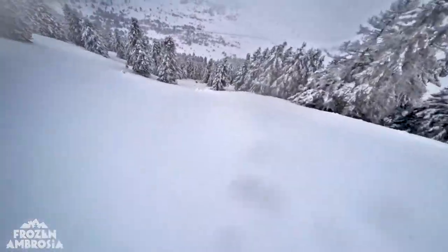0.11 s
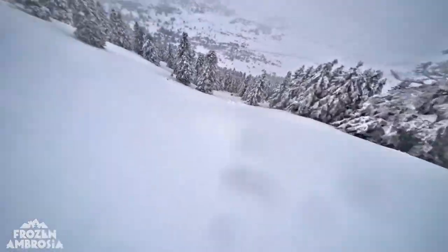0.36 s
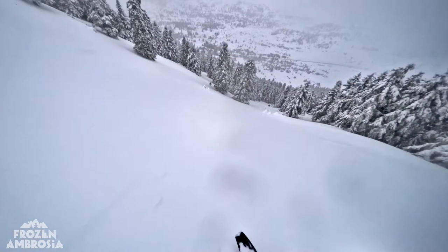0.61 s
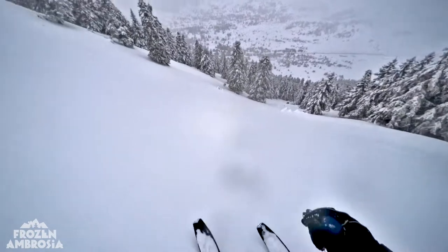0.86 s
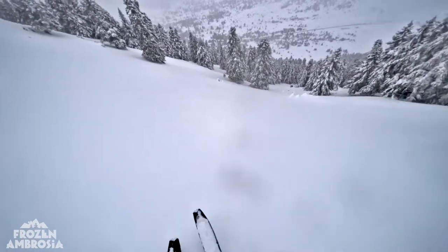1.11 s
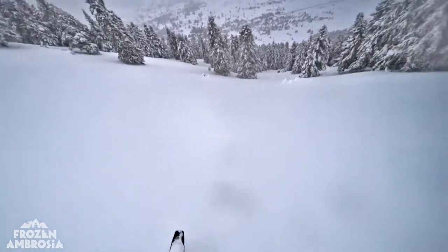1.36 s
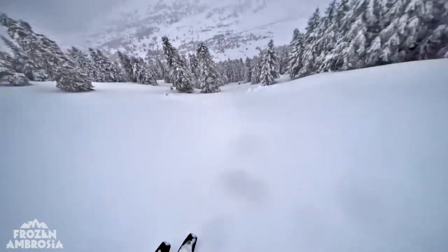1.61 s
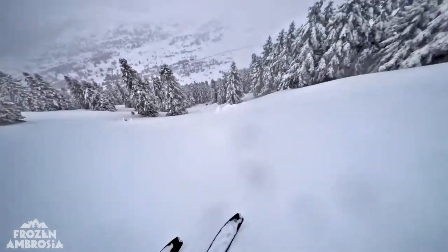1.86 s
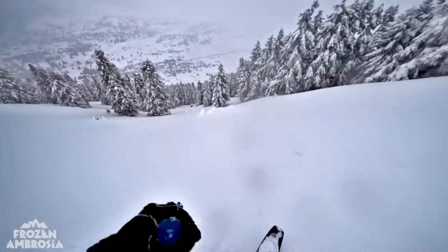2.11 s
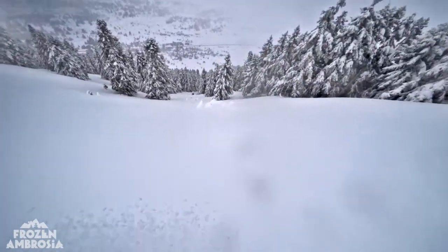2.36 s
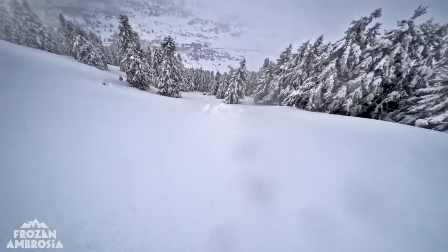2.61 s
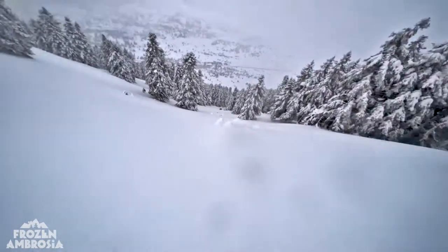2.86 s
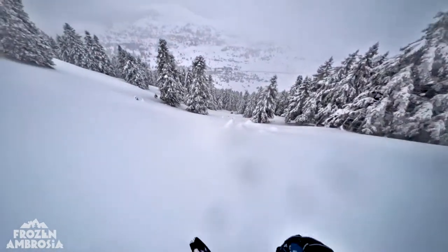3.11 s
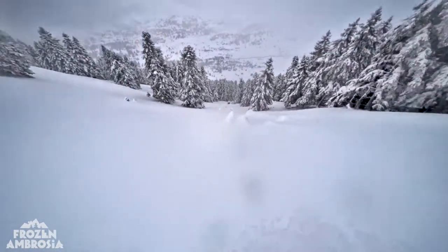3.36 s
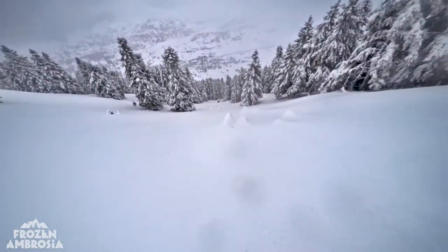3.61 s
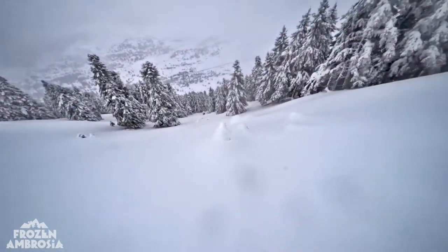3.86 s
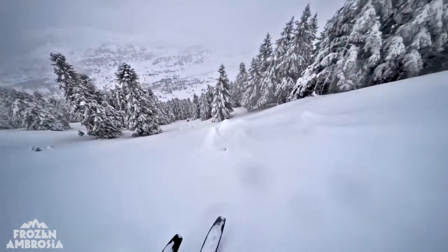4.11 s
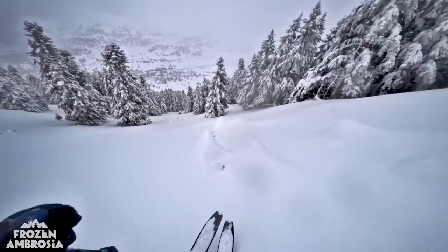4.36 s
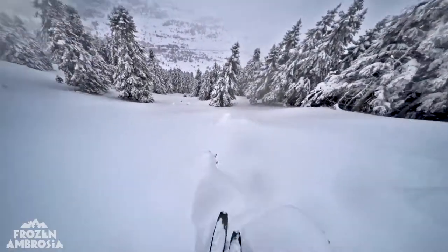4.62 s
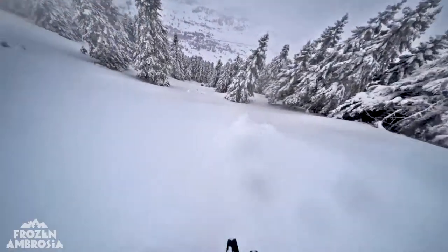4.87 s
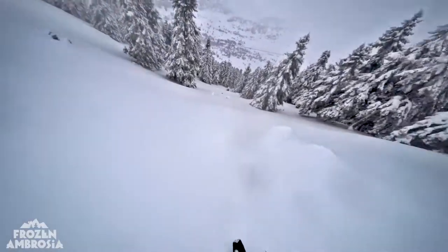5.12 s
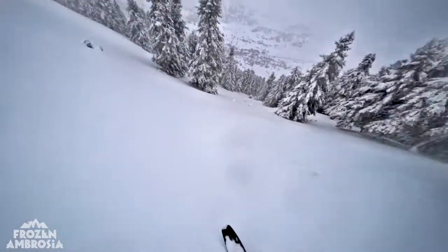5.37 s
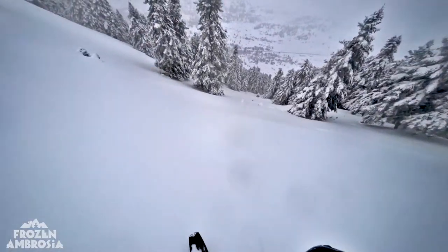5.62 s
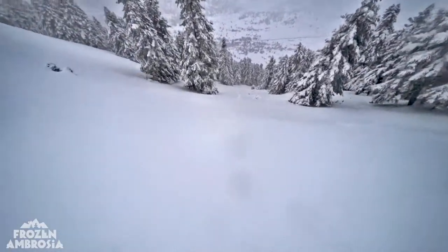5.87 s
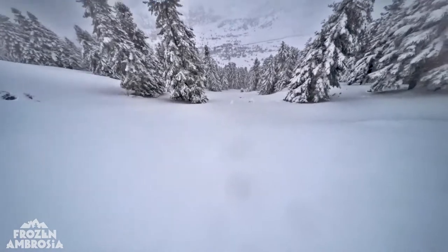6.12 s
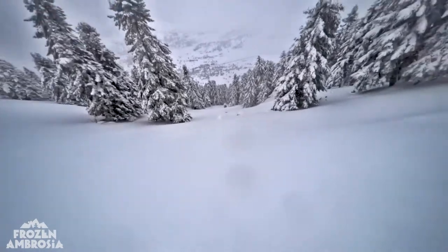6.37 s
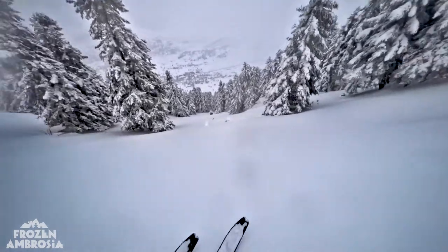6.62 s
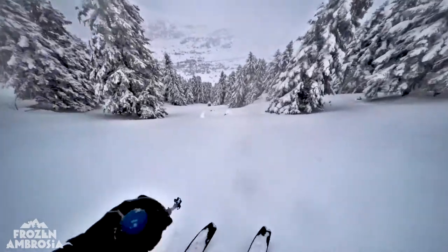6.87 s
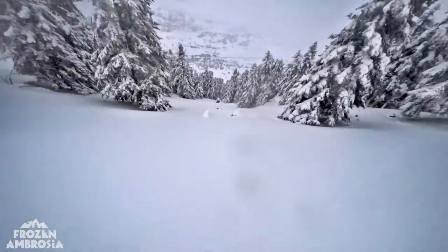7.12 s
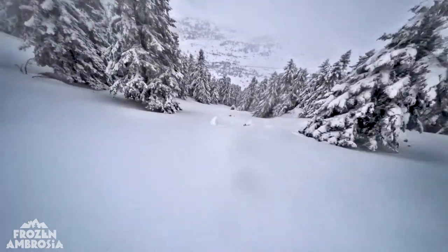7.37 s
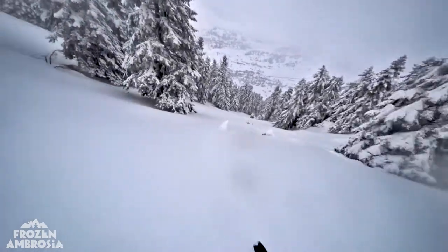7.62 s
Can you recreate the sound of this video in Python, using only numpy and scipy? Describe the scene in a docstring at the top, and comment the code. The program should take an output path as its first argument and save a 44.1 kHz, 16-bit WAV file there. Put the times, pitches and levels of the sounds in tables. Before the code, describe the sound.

Skier's head-mounted microphone hears deep wind buffeting, snow hiss swelling with each carve, and sharp little knocks rattling the plastic shell.

```python
"""Skiing in powder, heard at the head

A skier swings down a powder slope with a small camera in a plastic housing on the head.
Wind buffets the microphone port and booms in the housing: shaped noise on level curves. The skis hiss
through snow, swelling with each carve: flickering noise bands. Mount and ice tick and creak on the shell:
decaying rings, clicks and runs of slips. Shell resonances colour all but the low buffeting."""
import sys
import numpy as np
from scipy import signal
from scipy.fft import rfft, irfft, next_fast_len
from scipy.io import wavfile
from scipy.ndimage import uniform_filter1d

SR = 44100
rng = np.random.default_rng(int(sys.argv[2]) if len(sys.argv) > 2 else 0)


def unload_wav(signal):
    """Save mono or channel-first audio to the path in sys.argv[1] as 16-bit WAV at rate SR, clipped to [-1, 1]."""
    wavfile.write(
        sys.argv[1],
        SR,
        np.round(np.clip(np.atleast_2d(signal).T, -1, 1) * 32767).astype(np.int16),
    )


def decibels_to_gain(level_db):
    """Convert a level in decibels to a linear amplitude gain (20 dB per decade)."""
    exponent = np.asarray(level_db, float) / 20
    return 10 ** exponent


N = 341334


def rms_one(x):
    """Scales to rms 1."""
    return x / np.sqrt(np.mean(x ** 2) + 1e-20)


def in_time(rows):
    """Interpolates (t/s, level/dB) rows to one level a sample."""
    t_s, level_db = np.transpose(rows)
    return np.interp(np.arange(N) / SR, t_s, level_db)


def drift(rate_hz):
    """Slow chance of spread 1: noise through a two-pole low-pass, run at SR / 40."""
    hop = 40
    pole = np.exp(-2 * np.pi * rate_hz * hop / SR)
    noise = rng.standard_normal(N // hop + 2002)
    slow = signal.lfilter([1], [1, -2 * pole, pole * pole], noise)[2000:]  # settled part
    return np.interp(np.arange(N) / hop, np.arange(len(slow)), rms_one(slow))


def coloured(spectrum):
    """White noise shaped to (f/Hz, density/dB) rows, silent outside them; rms 1."""
    size = next_fast_len(N)
    hz, db = np.transpose(spectrum)
    bins_hz = np.maximum(np.fft.rfftfreq(size, 1 / SR), 1)
    shape = decibels_to_gain(np.interp(np.log(bins_hz), np.log(hz), db, left=-200, right=-200))
    noise = rng.standard_normal(size)
    return rms_one(irfft(rfft(noise) * shape, size)[:N])


def band(x, low_hz, high_hz):
    """Band-pass."""
    return signal.sosfilt(signal.butter(2, [low_hz, high_hz], "band", fs=SR, output="sos"), x)


def evened(x, span_s):
    """Divides out most of the level wander slower than the span."""
    return x / np.sqrt(uniform_filter1d(x ** 2, size=round(span_s * SR)) + 0.069)


def placed(times_s, peak_db, bursts):
    """Lays each burst, scaled to its peak level, at its time."""
    out = np.zeros(N + bursts.shape[1])
    for t_s, gain, burst in zip(times_s, decibels_to_gain(peak_db), bursts):
        start = round(t_s * SR)
        out[start:start + len(burst)] += gain * burst / np.abs(burst).max()
    return out[:N]


def clicks(times_s, peak_db, top_db):
    """Thin bright clicks of a millisecond or two, each ringing the top modes with strengths of its own."""
    # thin modes of a bright click: f/Hz, level/dB
    click_modes = [(6600, -11), (9600, -18.5)]
    top_hz, decay_60db_s = 13740, 0.0056
    t = np.arange(512) / SR
    noise = rng.standard_normal((len(times_s), 512))
    chance = rng.standard_normal((len(times_s), 2))
    click = 0.72 * noise
    for (hz, mode_db), luck in zip(click_modes, chance.T):
        click = click + decibels_to_gain(mode_db + 3.3 * luck)[:, None] * np.sin(2 * np.pi * hz * t)
    fade = decibels_to_gain(-60 * t / decay_60db_s)
    top = fade * np.sin(2 * np.pi * top_hz * t) * (1 + 0.39 * noise)
    bright = band(band(fade * click, 3400, 13000), 2870, 11500)
    return placed(times_s, peak_db, bright) + placed(times_s, peak_db + top_db, band(top, 13000, 19300))


def wind():
    """Turbulent eddies: slow heaves, a boom of the housing cavity, a lumpy flutter and a faint rush above."""
    # airflow over the port, as the boom it raises: t/s, level/dB
    airflow = [(0.0, -39), (0.11, -23), (0.41, -38.5), (0.45, -32.5), (1.25, -38.5), (1.66, -32),
               (2.09, -41), (2.2, -31.5), (2.24, -56), (2.39, -37.5), (2.78, -47.5), (3.17, -33),
               (3.47, -42.5), (4.31, -35.5), (4.48, -40.5), (4.98, -30.5), (5.02, -38), (5.24, -24.5),
               (5.26, -36.5), (5.69, -26.5), (5.73, -46), (5.78, -28.5), (6.23, -35.5), (6.29, -24),
               (6.62, -35.5), (6.68, -23.5), (6.88, -37), (7.74, -38)]
    # eddies shed at the port, as flutter: t/s, level/dB
    eddies = [(0.0, -43), (0.24, -39), (0.5, -45), (1.25, -49.5), (1.4, -40), (1.92, -43.5), (2.28, -54.5),
              (2.63, -51.5), (2.8, -53.5), (2.93, -43.5), (3.45, -59), (3.85, -49.5), (4.45, -50),
              (4.72, -45.5), (4.9, -36), (5.17, -38.5), (5.22, -30), (5.28, -40), (5.74, -37.5),
              (5.82, -45), (6.27, -42), (6.38, -38.5), (6.47, -42), (6.8, -39.5), (6.9, -49), (7.25, -49),
              (7.36, -44), (7.74, -48)]
    # slow heave below the boom: t/s, level/dB
    heaving = [(0.0, -49), (0.06, -39), (1.72, -34), (2.11, -39), (2.13, -32), (2.72, -43.5), (3.34, -31),
               (3.56, -46), (4.31, -34), (5.04, -39), (5.26, -27.5), (5.39, -39), (5.45, -30),
               (6.21, -39.5), (6.96, -32), (7.26, -52), (7.35, -36.5), (7.54, -41.5), (7.7, -31.5),
               (7.74, -37)]
    # noise spectra of the four layers: f/Hz, density/dB
    boom_spectrum = [(35, -18.5), (50, -8), (60, -0.5), (66, 2), (72, -2.5), (85, -12.5), (115, -34)]
    heave_spectrum = [(8, -19), (15, 1.5), (25, -7), (38, -5.5), (48, -7), (62, -36)]
    flutter_spectrum = [(60, -14), (95, 1.5), (125, -0.5), (165, -8.5), (220, -21.5), (300, -60)]
    rush_spectrum = [(140, 0), (220, 3), (330, -1.5), (480, -5.5), (800, -12), (1100, -20)]

    flutter_db = in_time(eddies)
    lumps = drift(9.2)
    gusts_db = 2.5 * drift(7)
    boom_db = in_time(airflow) + 1.66 * drift(8.6)
    heave_db = in_time(heaving) + 2.5 * drift(3.5)
    rush_db = -60 + 0.79 * (flutter_db - flutter_db.mean())  # follows the flutter's swing
    rush_db = rush_db + 0.57 * gusts_db + 1.4 * lumps + 1.76 * drift(40)
    boom = decibels_to_gain(boom_db) * evened(coloured(boom_spectrum), span_s=0.13)
    heave = decibels_to_gain(heave_db) * evened(coloured(heave_spectrum), span_s=0.151)
    flutter = decibels_to_gain(flutter_db + gusts_db + 0.61 * lumps) * evened(coloured(flutter_spectrum), span_s=0.08)
    rush = decibels_to_gain(rush_db) * coloured(rush_spectrum)
    return boom + heave + flutter, rush


def spray_level(hiss_db):
    """Spray in dB: a little while gliding, more while the edges bite, as soft-edged sagging plateaus."""
    # carves: start/s, length/s, level/dB, sag over the length/dB
    carves = [(0.24, 0.63, -60, 4.5), (1.577, 0.1, -45, 2.5), (1.767, .30, -50, 8.5), (2.798, 0.23, -63, 8),
              (3.778, 0.41, -50.5, 2.5), (4.768, 0.47, -50, 0.5), (5.277, 0.26, -52.5, -0.5),
              (5.98, 0.64, -60.5, 5), (6.237, 0.52, -42, 4), (7.285, 0.33, -55.5, 2.5)]
    bite_s, let_go_s = 0.07, 0.15  # rise; fall after the length
    t = np.arange(N) / SR
    power = decibels_to_gain(hiss_db - 7.5) ** 2  # gliding
    for start_s, length_s, db, sag_db in carves:
        rise = np.clip((t - start_s) / bite_s, 0, 1)
        fall = np.clip((start_s + length_s - t) / let_go_s + 1, 0, 1)
        sagging_db = db - sag_db * np.clip((t - start_s) / length_s, 0, 1)
        power += (rise * fall * decibels_to_gain(sagging_db)) ** 2
    return 10 * np.log10(power)


def skis():
    """Snow shears in uneven clumps, so all bands flicker partly together, partly alone."""
    # skis gliding in powder, as dull hiss: t/s, level/dB
    gliding = [(0.0, -57), (0.39, -55), (1.0, -56), (1.44, -56.5), (1.66, -50), (1.77, -52.5),
               (1.84, -48.5), (1.98, -52), (2.15, -60.5), (2.6, -68.5), (2.78, -63.5), (2.88, -56),
               (3.08, -58.5), (3.22, -61.5), (3.6, -67), (3.8, -58), (4.03, -54.5), (4.24, -58.5),
               (4.32, -61.5), (4.72, -56.5), (4.87, -51), (5.04, -49), (5.55, -52), (5.73, -57),
               (6.06, -54), (6.36, -48.5), (6.62, -47), (6.9, -55), (7.0, -66), (7.2, -57), (7.4, -54.5),
               (7.74, -52.5)]
    # fine powder hiss in the treble: t/s, level/dB
    treble = [(0.0, -74), (0.86, -64.5), (1.36, -73.5), (2.09, -66.5), (2.61, -76.5), (3.19, -66.5),
              (3.56, -74), (4.63, -71.5), (5.0, -63.5), (5.67, -67.5), (5.99, -75.5), (6.21, -69.5),
              (6.36, -60.5), (6.49, -60), (7.03, -72), (7.74, -69)]
    # noise spectra of the five bands: f/Hz, density/dB
    hiss_spectrum = [(650, -16.5), (950, -7.5), (1250, -4.5), (1650, 2), (1950, -0.5), (2400, -6)]
    swish_spectrum = [(1500, -35), (1900, -5), (2200, 1), (2500, 1.5), (2750, -6), (3200, -31)]
    spray_spectrum = [(2300, -31), (2700, -3), (3050, 4.5), (3400, -1.5), (3700, -17), (4200, -20)]
    fizz_spectrum = [(3300, -5.5), (3900, -3.5), (4400, -4), (4900, -7), (5500, -9.5), (6200, -33)]
    dust_spectrum = [(4500, -8), (5800, -3), (6600, 3.5), (7600, -8), (9500, -5.5), (11500, -13.5),
                     (16200, -14)]

    dust_db, hiss_db = in_time(treble), in_time(gliding)
    spray_db = spray_level(hiss_db)
    hiss_swing_db = hiss_db - hiss_db.mean()
    spray_swing_db = spray_db - spray_db.mean()
    swish_db = -57.5 + 0.91 * hiss_swing_db + 0.25 * spray_swing_db
    carve_fizz_db = -66 + 1.14 * spray_swing_db
    glide_fizz_db = dust_db + 2.5
    fizz_db = 10 * np.log10(decibels_to_gain(carve_fizz_db) ** 2 + decibels_to_gain(glide_fizz_db) ** 2)

    together_db = 0.61 * drift(13.0) + 1.62 * drift(95)
    out = decibels_to_gain(dust_db + 0.87 * together_db + 0.66 * drift(30)) * coloured(dust_spectrum)
    for db, spectrum in ((hiss_db, hiss_spectrum), (swish_db, swish_spectrum),
                         (spray_db, spray_spectrum), (fizz_db, fizz_spectrum)):
        out += decibels_to_gain(db + together_db + 1.2 * drift(4.4)) * coloured(spectrum)
    return out


def grains():
    """Loose ice grains pepper the shell: mostly tiny, a few larger, each thin in a range of its own."""
    # ranges of the grains: low f/Hz, high f/Hz, gain/dB
    grain_bands = [(1230, 2500, 27), (1400, 1900, 28), (4400, 8800, 14.5), (7500, 12600, 15),
                   (11000, 17000, 16)]
    sizes_db = -67.5 + 5.45 * np.minimum(rng.exponential(1, N), 4)  # before the range's gain
    sizes = decibels_to_gain(sizes_db) * rng.choice([-1, 1], N)
    rate_per_s = 90 * decibels_to_gain(3.0 * drift(2))
    hits = sizes * (rng.random(N) < rate_per_s / SR)
    dealt = rng.integers(0, len(grain_bands), size=N)
    out = np.zeros(N)
    for k, (low_hz, high_hz, db) in enumerate(grain_bands):
        out += decibels_to_gain(db) * band(hits * (dealt == k) + 1e-18, low_hz, high_hz)
    return out


def specks():
    """A hard ice crystal on the shell gives only the bright click."""
    # ice crystals: t/s, peak level/dB, topmost mode over the click/dB
    crystals = [(0.2129, -39, -25), (0.3341, -44, -20), (0.504, -46, -18), (1.052, -29.5, -15),
                (1.2271, -51, -7), (1.2486, -46, -16), (1.3319, -45, -22), (1.9424, -43, -29),
                (2.0108, -40.5, -11), (2.655, -46, -23), (2.7498, -42, -24), (3.2882, -44, -19),
                (3.473, -46, -5), (4.018, -43.5, -25), (4.6308, -41, -14), (4.7446, -44, -11),
                (4.844, -37, -22), (4.8544, -45, -8), (4.9127, -42, -15), (4.9753, -37, -9),
                (5.015, -28, -17), (5.1516, -30, -27), (5.1856, -46, -18), (5.4944, -33, -20),
                (5.6156, -48, -26), (5.6652, -42, -19), (5.731, -37, -10), (5.9643, -43, -16),
                (5.9873, -44, -15), (6.1504, -34, -7), (6.1624, -39, -18), (6.2791, -39, -21),
                (6.4497, -34.5, -11), (6.489, -26.5, -14), (6.559, -43, -27), (6.7075, -37, -26),
                (6.774, -41, -17), (7.0155, -47, -12.5), (7.0915, -45, -17), (7.1812, -34.5, -12),
                (7.2519, -43, -19)]
    return clicks(*np.transpose(crystals))


def ticks():
    """Each knock: a short ring at its own pitch, two wall modes, a broad snap, a dull thud and a bright click."""
    # knocks on the shell: t/s, ring peak level/dB, ring f/Hz, snap peak level/dB, bright click peak level/dB
    knocks = [(0.2311, -26.5, 2490, -45, -30), (0.2918, -36.5, 1830, -29, -35),
              (1.0433, -17.5, 1500, -66, -47), (1.1516, -23.5, 2180, -41, -29),
              (1.1825, -35, 1600, -58, -55), (1.2083, -43, 1670, -36, -37.5),
              (1.4354, -25.5, 2060, -25, -30), (1.5306, -17, 2500, -54, -29), (1.6594, -33, 3000, -42, -53),
              (1.8572, -33, 2000, -45, -33), (2.3178, -37.5, 2540, -51, -54), (2.383, -32, 1600, -67, -62),
              (2.4573, -42.5, 1580, -60, -80), (2.601, -43, 1530, -72, -62),
              (2.7259, -39, 1780, -33.5, -26), (3.0418, -36, 1740, -39, -34), (3.06, -27, 1920, -18.5, -29),
              (3.1722, -37.5, 1610, -54, -58), (3.2336, -37.5, 1680, -41, -45),
              (3.5451, -30, 2440, -62, -40), (3.5765, -37.5, 2310, -58, -41), (3.7506, -40, 2530, -44, -36),
              (4.5621, -33, 2320, -43, -49), (4.5741, -30, 1410, -53, -55), (4.591, -26, 1350, -54, -51),
              (4.6523, -35, 2080, -47, -50), (4.8184, -30.5, 2190, -37, -25.5),
              (4.8365, -29, 1870, -71, -56), (4.894, -21, 1640, -24.5, -27.5), (5.003, -19, 2090, -41, -20),
              (5.0532, -29, 1870, -31, -36), (5.142, -33.5, 1690, -29, -36), (5.2111, -21, 2030, -58, -55),
              (5.2203, -35, 1910, -49, -49), (5.2386, -25, 1650, -35, -29), (5.3862, -37, 2110, -36, -59),
              (5.4555, -31.5, 3050, -31, -34), (5.4775, -27, 2100, -29, -25.5),
              (5.5955, -31.5, 2140, -29.5, -33), (5.8191, -19.5, 2160, -29.5, -34.5),
              (5.9347, -33, 1810, -36, -27), (6.002, -29, 1570, -56, -64), (6.0366, -29, 2230, -45, -58),
              (6.129, -33.5, 2170, -24, -25), (6.1402, -21.5, 1700, -26.5, -25),
              (6.2318, -34, 1980, -28.5, -60), (6.886, -36.5, 2470, -58, -40.5),
              (6.9486, -27.5, 2880, -50, -35), (6.9954, -23, 1320, -41, -35), (7.064, -43, 1750, -43, -56),
              (7.232, -36, 3140, -42, -50), (7.262, -36, 1130, -61, -67), (7.3462, -29.5, 1500, -54, -38),
              (7.4686, -38, 2100, -38, -40), (7.6468, -32.5, 1720, -57, -47)]
    # wall modes rung by every knock: f/Hz, level re ring/dB
    walls = [(1200, -12.5), (2350, -8.5)]
    spread_db = 4.0  # chance from knock to knock
    times_s, ring_db, ring_hz, snap_db, click_db = np.transpose(knocks)
    t = np.arange(1024) / SR
    noise = rng.standard_normal((len(times_s), 1024))
    chance = rng.standard_normal((len(times_s), 4))

    ring = np.sin(2 * np.pi * ring_hz[:, None] * t) + 0.71 * noise
    for (wall_hz, wall_db), luck in zip(walls, chance.T):
        ring = ring + decibels_to_gain(wall_db + spread_db * luck)[:, None] * np.sin(2 * np.pi * wall_hz * t)
    ring = (1 - np.exp(-t / 0.00038)) * decibels_to_gain(-60 * t / 0.011) * ring
    snap = decibels_to_gain(-60 * t / 0.0025) * noise
    thud = decibels_to_gain(-60 * t / 0.0038) * (1.1 + noise)
    thud_db = ring_db - 18.5 + 2.5 * chance[:, 2]
    top_db = -12 + spread_db * chance[:, 3]
    return (placed(times_s, ring_db, band(ring, 850, 5000))
            + placed(times_s, snap_db, band(snap, 3960, 5020))
            + placed(times_s, thud_db, band(thud, 200, 990))
            + clicks(times_s, click_db, top_db))


def creaks():
    """Stick and slip of the mount: dense uneven clicks inside each creak."""
    # creaks, quick runs of slips: start/s, length/s, level/dB
    runs = [(1.026, 0.067, -42), (2.46, 0.12, -60.0), (3.041, 0.0084, -43), (3.57, 0.1, -58.5),
            (4.539, 0.07, -42), (4.634, 0.038, -45), (5.204, 0.027, -43)]
    slips_per_s = 5000
    t, gate = np.arange(N) / SR, np.zeros(N)
    for start_s, length_s, db in runs:
        phase = np.pi * np.clip((t - start_s) / length_s, 0, 1)
        gate += decibels_to_gain(db) * np.sqrt(np.clip(np.sin(phase), 0, 1))
    slips = (rng.random(N) < slips_per_s / SR) * rng.standard_normal(N) * decibels_to_gain(1.2 * drift(120))
    return gate * (rms_one(band(slips, 1110, 2600)) + 0.12 * rms_one(band(slips, 2600, 8200)))


def shell(x):
    """Each housing resonance, in series, lifts or dents the sound passing through."""
    # resonances of the housing: f/Hz, width/Hz, level/dB
    resonances = [(584, 44, 7.5), (1197, 140, 4), (1594, 70, 2.5), (2540, 55, 2.5), (2980, 150, 2.5),
                  (4450, 170, 5), (5150, 107, -8.5), (6480, 190, -0.5), (9500, 490, -0.5)]
    for hz, width_hz, db in resonances:
        r, w = np.exp(-np.pi * width_hz / SR), 2 * np.pi * hz / SR
        peak = signal.lfilter([(1 - r * r) / 2, 0, (r * r - 1) / 2], [1, -2 * r * np.cos(w), r * r], x)
        x = x + (decibels_to_gain(db) - 1) * peak
    return x


def scene():
    """The low buffeting acts on the capsule directly, the rest comes through the shell."""
    buffet, rush = wind()
    through_shell = rush + skis() + grains() + specks() + ticks() + creaks()
    return (buffet + shell(through_shell))[None]


def roll_off(x):
    """The treble ends steeply here."""
    return signal.sosfilt(signal.butter(12, 16500, fs=SR, output="sos"), x)


def record(dry):
    """Adds microphone self-noise and cuts the top."""
    noisy = dry + decibels_to_gain(-75.0) * rms_one(band(rng.standard_normal(N), 2400, 21000))
    cut = signal.sosfilt(signal.butter(8, 15300, fs=SR, output="sos"), noisy)
    return roll_off(cut)


dry = scene()
out = record(dry)
unload_wav(out)
```